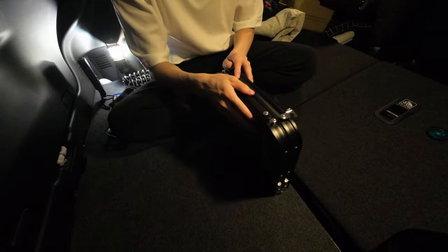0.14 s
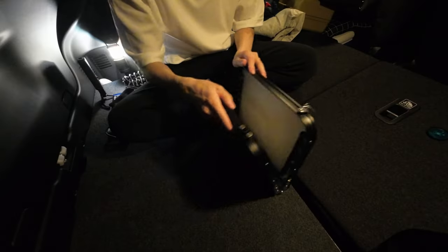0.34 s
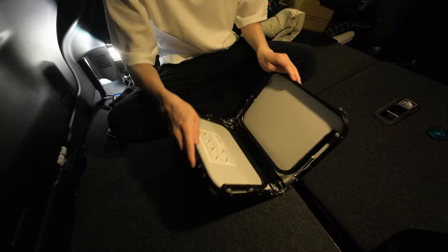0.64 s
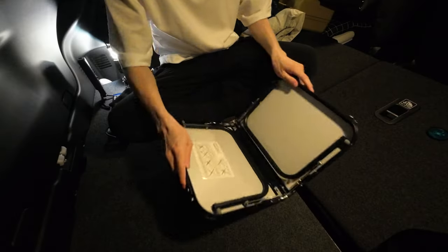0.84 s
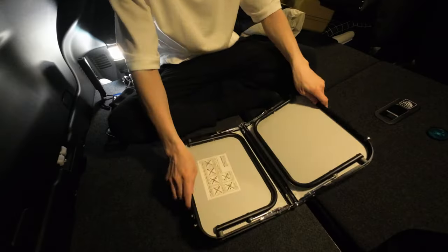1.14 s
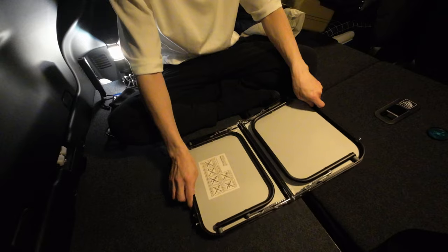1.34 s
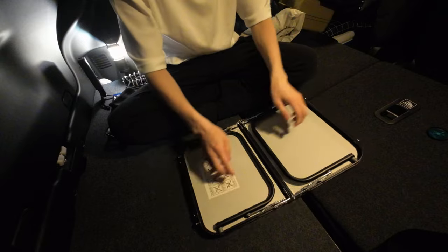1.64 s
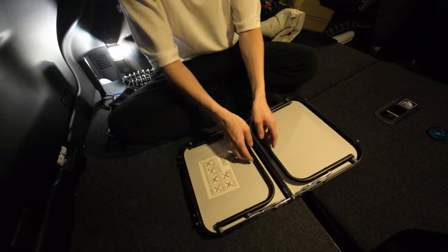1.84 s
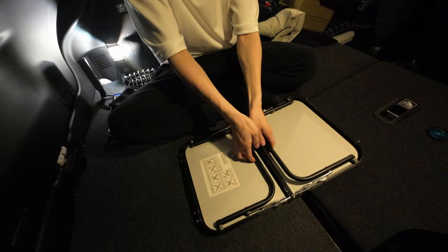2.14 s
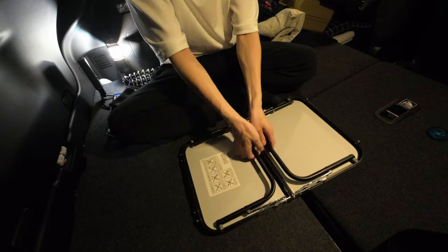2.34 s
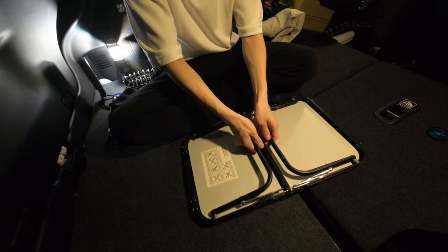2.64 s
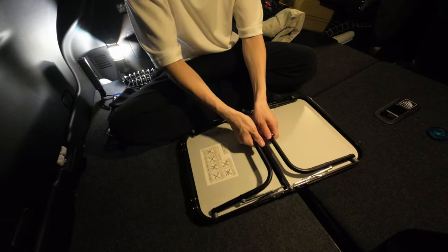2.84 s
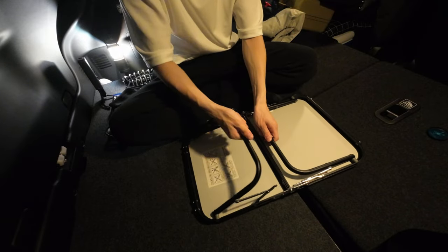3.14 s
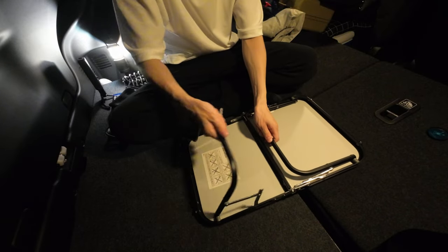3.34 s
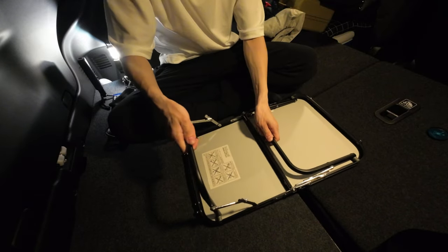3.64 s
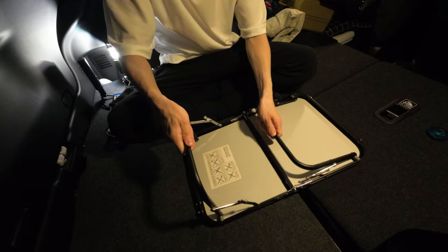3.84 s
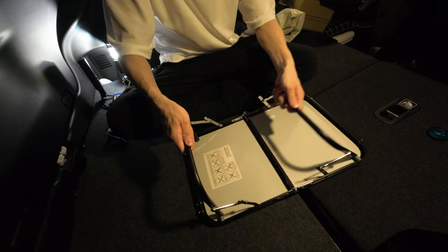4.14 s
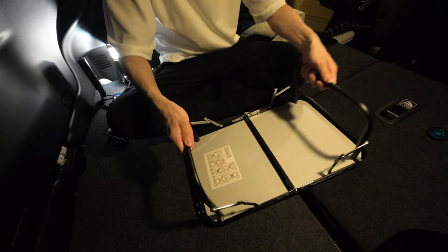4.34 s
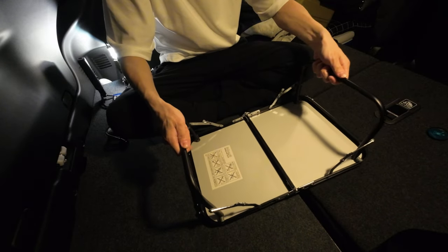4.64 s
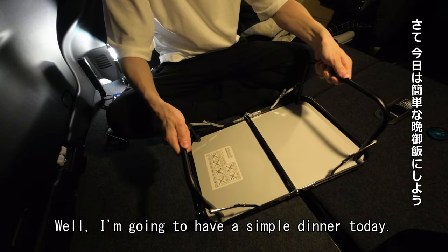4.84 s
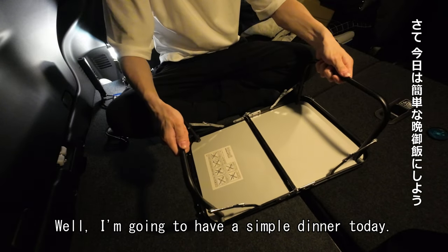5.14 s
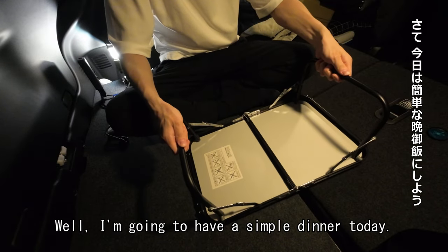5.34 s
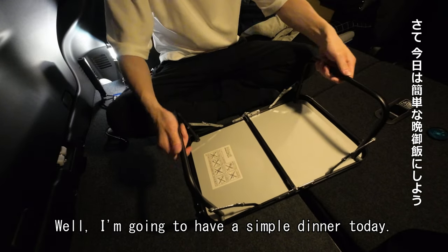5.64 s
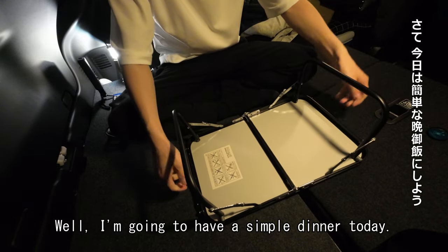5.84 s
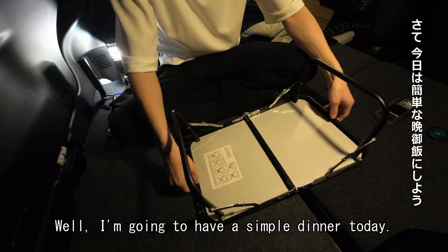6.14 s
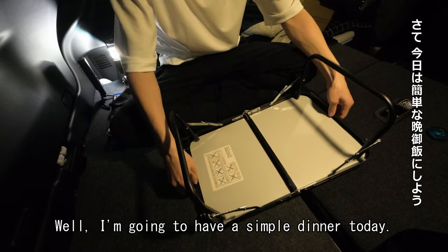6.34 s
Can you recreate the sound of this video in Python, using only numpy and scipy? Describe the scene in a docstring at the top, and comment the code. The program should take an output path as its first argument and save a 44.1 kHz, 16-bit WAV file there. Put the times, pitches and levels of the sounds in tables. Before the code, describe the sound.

Soft rubbing, small metallic ticks and dull floor knocks as a folding table is unfolded, one leg snapping out hard over faint traffic rumble.

```python
"""A folding table with a tube frame is opened by hand on the padded floor of a parked car at night.
Distant traffic rumbles through the cabin throughout, as shaped noise. For three seconds hinges, tubes
and sleeves rub (noise through broad spectra and resonances), catches tick and the floor thuds (struck modes).
Near 3 s one leg snaps free and thumps the floor hardest; soft strokes follow, then a few last contacts."""
import sys
import numpy as np
from scipy import signal
from scipy.fft import rfft, irfft, next_fast_len
from scipy.io import wavfile

SR = 44100
rng = np.random.default_rng(int(sys.argv[2]) if len(sys.argv) > 2 else 0)


def digitize_waveform(pressure):
    """Quantize a signal to 16-bit integers and store it at the path in sys.argv[1].

    Rows of a 2-D input are taken as channels; values are limited to [-1, 1].
    """
    field = np.atleast_2d(pressure).T
    bounded = np.clip(field, -1, 1)
    quanta = np.round(bounded * 32767).astype(np.int16)
    wavfile.write(sys.argv[1], SR, quanta)


N = 287091


def from_db(db):
    """Level to amplitude: 20 dB is a factor of ten."""
    return 10 ** (np.asarray(db) / 20)


def rms_one(x):
    """Normalization to unit root-mean-square amplitude."""
    return x / np.sqrt(np.mean(x ** 2) + 1e-20)


def drift(rate_hz):
    """Low-pass filtered noise: a double pole leaves slow fluctuation, of rms 1."""
    step = 40     # samples between computed values
    pole = np.exp(-2 * np.pi * rate_hz * step / SR)
    settle = 2000
    noise = rng.standard_normal(N // step + 2 + settle)
    slow = signal.lfilter([1], [1, -2 * pole, pole * pole], noise)[settle:]
    return np.interp(np.arange(N) / step, np.arange(len(slow)), rms_one(slow))


def coloured(x, spectrum):
    """Spectral shaping: a gain curve over log frequency filters a steady signal; rms 1."""
    size = next_fast_len(N)
    pitch_hz, density_db = np.transpose(spectrum)
    bin_hz = np.arange(size // 2 + 1) * SR / size
    gain_db = np.interp(np.log(bin_hz + 1), np.log(pitch_hz), density_db, left=-90, right=-90)
    return rms_one(irfft(rfft(x, size) * from_db(gain_db), size)[:N])


def band(x, low_hz, high_hz):
    """Band-pass filtering by a Butterworth response."""
    return signal.sosfilt(signal.butter(2, [low_hz, high_hz], "band", fs=SR, output="sos"), x)


def ring(drive, hz, t60_s):
    """Damped resonance: a unit click starts a decaying sine of height about 1."""
    pole = from_db(-60 / (t60_s * SR))
    angle = 2 * np.pi * hz / SR
    # the tiny offset keeps the decay clear of denormal numbers
    return signal.lfilter([0, np.sin(angle)], [1, -2 * pole * np.cos(angle), pole * pole], drive + 1e-18)


def width_to_t60(width_hz):
    """Reciprocity of bandwidth and decay: the narrower a resonance, the longer it rings."""
    return np.log(1000) / np.pi / width_hz


def grit(spread_db):
    """Stick-slip friction as dense tiny slips of uneven size; rms 1."""
    unevenness = np.minimum(rng.exponential(1, N), 5)
    return rms_one(rng.standard_normal(N) * from_db(spread_db * unevenness))


def cabin():
    """Low-pass transmission: distant traffic reaches the cabin as a boom, with dull noise and a thin tone."""
    # level of the boom over time: start_s, level_db
    boom_levels = [(0.0, -47.5), (0.6, -48.5), (1.07, -43.5), (1.21, -47.5), (1.89, -50.5), (2.03, -46.5),
                   (3.23, -48), (3.48, -49.5), (3.79, -47), (4.02, -50.5), (4.71, -47), (4.95, -50.5),
                   (5.39, -47), (5.77, -48.5), (6.15, -45.5), (6.51, -49)]
    # noise spectrum of the boom: pitch_hz, relative_density_db
    boom_spectrum = [(12, -60.5), (20, -10), (59, -0.5), (79, -2), (96, -10.5), (119, -7), (151, -20),
                     (182, -16.5), (200, -26), (260, -65.5), (440, -120)]
    # noise spectrum of the steady hush: pitch_hz, relative_density_db
    hush_spectrum = [(76, -28), (130, 3.5), (141, -21), (165, 0.5), (303, -4), (370, -8), (443, -11.5),
                     (952, -17), (1010, -17), (1100, -21.5), (2170, -38.5), (2820, -40), (10600, -50.5),
                     (12500, -46.5), (15900, -68.5)]
    start_s, level_db = np.transpose(boom_levels)
    boom_db = np.interp(np.arange(N) / SR, start_s, level_db)
    boom = from_db(boom_db) * coloured(rng.standard_normal(N), boom_spectrum)
    hush = from_db(-58 + 1.56 * drift(3.9)) * coloured(rng.standard_normal(N), hush_spectrum)
    whine = from_db(-101) * rms_one(ring(rng.standard_normal(N), hz=12000, t60_s=0.1))
    return boom + hush + whine


def squeaks():
    """Frictional excitation of a single resonance, lasting as long as the stroke."""
    # strokes that each drive one narrow resonance: start_s, length_s, pitch_hz, width_hz, level_db
    squeak_strokes = [(.63, .115, 4900, 120, -66), (.855, .2, 3000, 90, -61), (.865, .035, 5500, 200, -64),
                      (.87, .11, 2760, 100, -62), (.93, .19, 490, 50, -61), (1.25, .08, 1020, 60, -67),
                      (.95, .13, 4950, 120, -66), (.85, .08, 1470, 80, -64), (.97, .11, 1420, 50, -62),
                      (.97, .09, 5500, 120, -68), (1.19, .03, 1430, 50, -68), (1.24, .06, 2750, 150, -68),
                      (1.26, .14, 1450, 80, -70), (3.3, .2, 2900, 200, -85), (3.66, .21, 3300, 400, -79),
                      (4.71, .12, 3400, 250, -77), (5.67, .1, 5755, 90, -83), (5.715, .055, 5755, 45, -81)]
    t, out = np.arange(N) / SR, np.zeros(N)
    for start_s, length_s, pitch_hz, width_hz, level_db in squeak_strokes:
        done = np.clip((t - start_s) / length_s, 0, 1)
        envelope = np.sin(np.pi * done) ** 0.12     # nearly flat, with quick ends
        tone = rms_one(ring(grit(spread_db=5.0), pitch_hz, width_to_t60(width_hz)))
        out += from_db(level_db) * envelope * tone
    return out


def stroke_levels():
    """Incoherent addition: strokes swell and die, and overlapping ones add in power."""
    # hand strokes over frame and hinge: start_s, strongest_s, end_s, rub_db, cloth_db, tube_ring_db
    # (a row that ends before it starts stays silent)
    hand_strokes = [(0.085, 0.13, 0.14, -78, -69.5, -90), (0.124, 0.168, 0.31, -71.5, -70, -67),
                    (0.24, .40, 0.81, -70, -68.5, -72), (0.497, 0.705, 0.88, -61, -65.5, -61.5),
                    (0.793, 0.906, 1.1, -57, -66.5, -56.5), (0.906, 1, 1.196, -56.5, -63, -55.5),
                    (1.087, 1.24, 1.47, -63, -73.5, -67), (1.286, 1.407, 1.61, -67, -74, -88),
                    (1.517, 1.607, 1.645, -73.5, -74, -84), (1.865, 1.885, 2.05, -70, -75, -59.5),
                    (2.022, 2.167, 2.26, -66, -72, -65), (2.27, 2.288, 2.46, -73, -85, -72),
                    (2.363, 2.413, 2.52, -65.5, -69.5, -70), (2.47, 2.52, 2.74, -68.5, -72.5, -72.5),
                    (2.588, 2.72, 2.78, -68, -78, -72), (2.734, 2.82, 3.06, -73, -83, -76),
                    (3.11, 3.417, 3.48, -73.5, -83, -79), (3.384, 3.542, 3.72, -76, -79, -80),
                    (3.605, 3.723, 3.98, -73, -88, -69), (3.847, 4.153, 4.5, -75, -85.5, -72.5),
                    (4.216, 4.42, 4.50, -77, -82, -86), (4.53, 4.60, 4.3, -91, -97, -90),
                    (4.68, 4.765, 4.9, -70, -78, -69), (4.865, 4.946, 4.85, -75, -84, -89),
                    (5.21, 5.286, 5.7, -79, -87, -82), (5.36, 5.456, 5.52, -80, -88, -86),
                    (5.573, 5.706, 5.78, -77.5, -74.5, -88), (5.66, 5.74, 5.74, -79, -68.5, -90),
                    (6.01, 6.072, 6.14, -75.5, -83, -91), (6.101, 6.198, 8.9, -81, -83, -85),
                    (6.25, 6.29, 6.39, -67.5, -74, -73), (6.364, 6.44, 6.54, -67, -69.5, -73)]
    # hands never lie quite still, resting levels: rub_db, cloth_db, tube_ring_db
    rest_db = [-85.5, -101, -99]
    t = np.arange(N) / SR
    power = from_db(rest_db)[:, None] ** 2 * np.ones(N)
    for start_s, strongest_s, end_s, *levels_db in hand_strokes:
        progress = np.interp(t, [start_s, strongest_s, end_s], [0, 1, 0])
        envelope = np.sin(np.pi / 2 * progress) ** 1.6     # a higher power makes it more pointed
        power += (from_db(levels_db)[:, None] * envelope) ** 2
    return np.sqrt(power)


def handling():
    """Friction noise: slips sound broadly or, metal on metal, drive the resonances of the tubes."""
    # resonances of the rubbed tubes: pitch_hz, width_hz, relative_level_db
    tube_resonances = [(503, 130, 9.5), (848, 33, 4.5), (1439, 25, 4.5), (1493, 55, -1), (1980, 120, -7),
                       (2743, 170, -0.5), (3040, 90, -5), (3220, 29, -27), (4330, 53, -29), (4830, 120, -9),
                       (5810, 110, -11)]
    # noise spectrum of the rubbing: pitch_hz, relative_density_db
    rub_spectrum = [(530, -34), (900, -1.5), (1130, -6.5), (2360, -5), (2750, -7.5), (4290, -6.5),
                    (5000, -6.5), (5400, -7.5), (9000, -17), (11700, -29), (19800, -120)]
    # noise spectrum of rustling sleeves: pitch_hz, relative_density_db
    cloth_spectrum = [(3650, -32.5), (6200, -6.5), (8940, -8.5), (12200, -1), (13300, -4.5), (14200, -12.5),
                      (15200, -11), (15900, 4.5)]
    rub_level, cloth_level, tube_level = stroke_levels()
    slips = grit(spread_db=2.0) * from_db(1.54 * drift(25))
    tube_ring = np.zeros(N)
    for k, (pitch_hz, width_hz, level_db) in enumerate(tube_resonances):
        tone = rms_one(ring(slips, pitch_hz, width_to_t60(width_hz)))
        # neighbouring resonances add with opposite sign
        tube_ring += (-1) ** k * from_db(level_db + 4.6 * drift(12.0)) * tone
    rub = rub_level * coloured(slips, rub_spectrum)
    rustle = cloth_level * coloured(grit(spread_db=2.5), cloth_spectrum) * from_db(0.75 * drift(30))
    return rub + tube_level * rms_one(tube_ring) + rustle


def thumps():
    """Modal superposition: a short push starts the floor, its lowest mode opposing the others, so the thud swells."""
    # pushes into the floor: start_s, level_db, second_mode_db, upper_modes_db, damping_factor
    pushes = [(1.017, -31.5, -12, -3, 1.6), (1.061, -34.5, -13, -5, 0.52), (1.417, -38, 4, 0, 2),
              (1.872, -36, -5, 10, 1.5), (1.883, -33.5, -1.5, -20, 2), (1.892, -37.5, -10, 12.5, 1),
              (2.056, -60, 4, 9, 1.5), (2.147, -44, 6, -9, 1), (2.159, -35.5, 1, -1, 0.64),
              (2.184, -28.5, -2.5, -23, 0.82), (2.292, -39.5, 5.5, -13, 1.1), (2.405, -33, -8.5, -15, 0.71),
              (2.696, -32.5, 3.5, -9, 0.7), (2.745, -37.5, 6, -13, 1.46), (2.991, -9.5, 2, 6.5, 1.22),
              (3.074, -30, -3.5, -15, 0.59), (6.052, -46, 0, 5, 1), (6.279, -40, -14, -3, 0.93),
              (6.317, -46, -6, -5, 0.64), (6.425, -40.5, -10, 9, 0.78), (6.448, -38.5, -8, 5, 0.68)]
    # modes of the floor: pitch_hz, relative_level_db, t60_s at damping factor 1
    floor_modes = [(64.3, -0.5, 0.2), (118.3, 1, 0.11), (229.7, -13.5, 0.11), (315, -13.5, 0.079),
                   (446, -40, 0.12), (465.4, -22.5, 0.121)]
    out, size = np.zeros(N), SR // 2
    push_s = 0.0026
    push = np.sin(np.pi * np.minimum(np.arange(size) / SR / push_s, 1)) ** 2
    push = push / push.sum()
    for start_s, level_db, second_db, upper_db, damping in pushes:
        tilt_db = [0, second_db] + [upper_db] * (len(floor_modes) - 2)
        swings = [from_db(mode_db + tilt) * ring(push, pitch_hz, t60_s / damping)
                  for (pitch_hz, mode_db, t60_s), tilt in zip(floor_modes, tilt_db)]
        thud = from_db(level_db) * (swings[0] - sum(swings[1:]))
        at = round(start_s * SR)
        out[at:at + size] += thud[:N - at]
    return out


def ticks():
    """Impact excitation: each contact chatters in panel, frame and bright bands and strikes the frame modes."""
    # contacts on the frame: start_s, level_db, panel_db, bright_db, chatter_t60_s, touched_pitch_hz
    contacts = [(0.1644, -62, 19.5, -2, .12, 1410), (0.7291, -50.5, 8, -2, .045, 4900),
                (0.8726, -46.5, 0.5, -3, 0.061, 3030), (0.9087, -44, -13, -9, 0.061, 2980),
                (0.9549, -46.5, -1, 0.5, 0.043, 2940), (1.1214, -54, -1, -6, 0.046, 1650),
                (1.1445, -49, -4, -6, .048, 1470), (1.225, -48, -20, -2.5, 0.053, 2760),
                (1.2587, -54.5, -10, 1, 0.08, 2830), (1.4192, -57.5, 8, 4, .058, 6970),
                (1.4528, -48.5, -9, -12, 0.082, 3420), (1.487, -49, -2, -8, 0.041, 2300),
                (1.5197, -47, -15, -6.5, 0.049, 4730), (1.8747, -43.5, 7, -14, 0.17, 950),
                (1.8825, -42, 0, -16, .046, 600), (1.8926, -41, 10, -12, 0.046, 874),
                (1.9113, -50, 11, -22, 0.12, 600), (1.947, -50.5, -10, -11, 0.054, 1400),
                (2.0568, -50, 7.5, -11, 0.031, 1690), (2.147, -46.5, 15.5, 0, 0.043, 1580),
                (2.246, -55, 10.5, -4.5, 0.068, 840), (2.2906, -52, -5, 0, 0.052, 5800),
                (2.3732, -53, 11.5, -28, 0.079, 910), (2.4212, -52, -5, -15, 0.044, 1760),
                (2.561, -56.5, 1, -6, .045, 1420), (2.6447, -44.5, -8, -6.5, 0.046, 1570),
                (2.6937, -38, 12, -34, 0.054, 825), (2.9928, -31, -22, -17, 0.054, 1500),
                (2.9988, -22.5, -3, -13.5, 0.061, 1340), (3.0067, -20.5, -3, -13, 0.039, 3400),
                (3.0121, -32, 7, -28, 0.041, 1400), (3.025, -45.5, 24, -32, 0.064, 1620),
                (3.8107, -63, 12, -13, 0.046, 1490), (3.933, -66.5, 16.5, -5, 0.11, 2380),
                (3.967, -61.5, 13, -15, 0.095, 1450), (5.463, -55.5, 11.5, -6, .034, 2260),
                (6.053, -55.5, 14, -20, 0.041, 810), (6.144, -59.5, -8, -7, 0.051, 3610),
                (6.2815, -43, 9, -20, 0.045, 2000), (6.3055, -54.5, 13, -11, 0.059, 4960),
                (6.3172, -48, 13, -17, 0.064, 800), (6.4278, -45.5, 7.5, -24, 0.044, 805),
                (6.4488, -54.5, 15, -14, 0.091, 800)]
    # modes of the frame: pitch_hz, relative_level_db, t60_s before the holding hand shortens it
    frame_modes = [(596, -12, 0.11), (824, -11, 0.16), (967, -14.5, 0.11), (1186, -21, 0.12),
                   (1284, -16, 0.13), (1413, -16.5, 0.094), (1550, -9.5, 0.097), (1740, -8, 0.09),
                   (1860, -26, 0.039), (2200, -15.5, 0.098), (2390, -11, 0.033), (2639, -13, 0.056),
                   (2750, -19, 0.07), (3107, -10.5, 0.049), (3550, -14.5, 0.024), (3570, -17, 0.014),
                   (4300, -23.5, 0.058), (4430, -31, 0.057), (4590, -15, 0.066), (4870, -8.5, 0.012),
                   (5036, -21.5, 0.046), (5690, -16, 0.024), (6300, -25.5, 0.043), (8060, -17.5, 0.017)]
    near_boost_db, near_octaves = 10.5, 0.3     # modes near the touched region ring loudest
    held_t60_s = 0.065     # the hand on the frame damps its ring along with the chatter
    out, size = np.zeros(N), SR // 5
    age_s = np.arange(size) / SR
    mode_hz, mode_db, mode_t60_s = np.transpose(frame_modes)
    for start_s, level_db, panel_db, bright_db, chatter_t60_s, near_hz in contacts:
        chatter = rng.standard_normal((3, size)) * from_db(-60 * age_s / chatter_t60_s)
        chatter[:, 0] += 6.0     # the first touch is one sharp click
        blow = 0.095 * chatter[0]

        octaves_away = np.log2(mode_hz / near_hz)
        boost_db = near_boost_db * np.exp(-(octaves_away / near_octaves) ** 2)
        struck_db = mode_db + rng.normal(0, 2.5, len(frame_modes)) + boost_db
        held_share = chatter_t60_s / (chatter_t60_s + held_t60_s)
        modes = sum(from_db(db) * ring(blow, hz, t60_s * held_share)
                    for hz, db, t60_s in zip(mode_hz, struck_db, mode_t60_s))
        frame = from_db(-7) * band(chatter[0], 1500, 4000) + from_db(-6.0) * modes

        board = from_db(-12) * ring(blow, hz=306.4, t60_s=0.07)     # the table top drums
        panel = from_db(panel_db) * (band(chatter[1], 250, 1100) + board)

        # harder blows reach higher: 196 Hz more per dB
        bright_top_hz = np.clip(10500 + 196 * (level_db + 46.5), 8000, 13000)
        bright = from_db(bright_db) * band(chatter[2], 5000, bright_top_hz)

        at = round(start_s * SR)
        out[at:at + size] += (from_db(level_db) * (frame + panel + bright))[:N - at]
    return out


def scene():
    """Linear superposition of all sources in one channel."""
    return (cabin() + squeaks() + handling() + thumps() + ticks())[None]


def record(dry):
    """Band limiting: a steep elliptic low-pass removes the top of the spectrum."""
    cutoff_hz = 15750
    low_pass = signal.ellip(12, 0.5, 70, cutoff_hz, fs=SR, output="sos")     # ripple dB, stopband dB
    return signal.sosfilt(low_pass, dry)


dry = scene()
out = record(dry)
digitize_waveform(out)
```